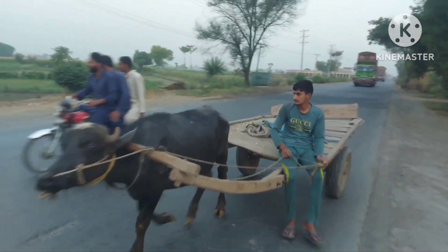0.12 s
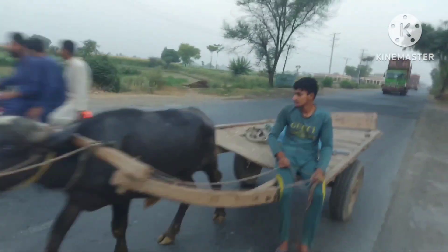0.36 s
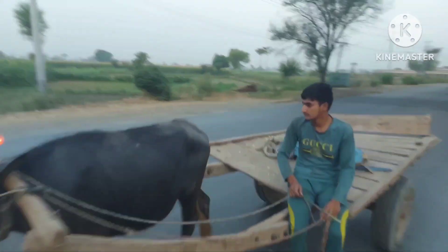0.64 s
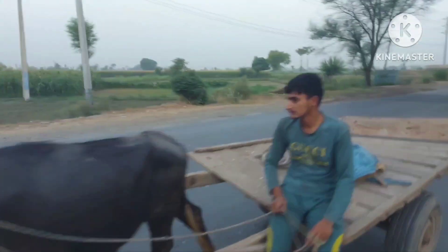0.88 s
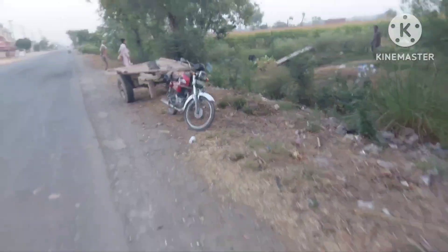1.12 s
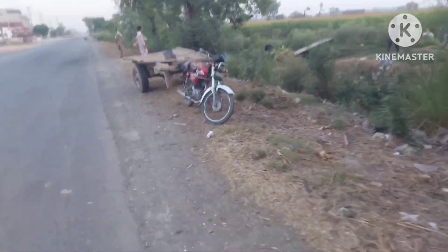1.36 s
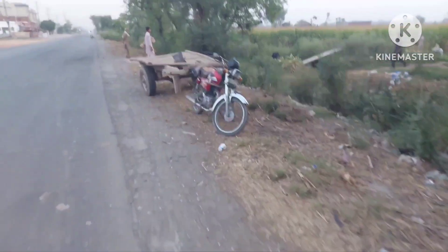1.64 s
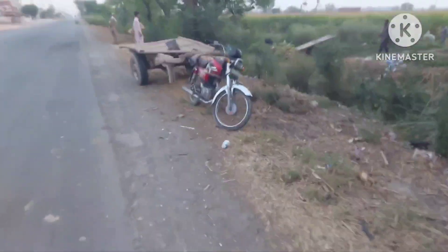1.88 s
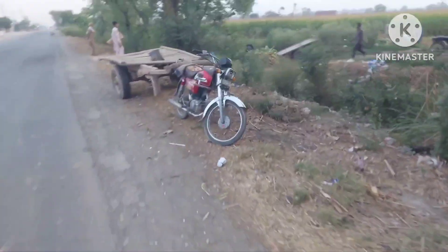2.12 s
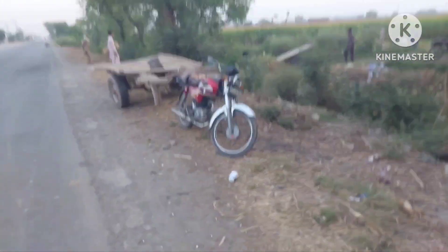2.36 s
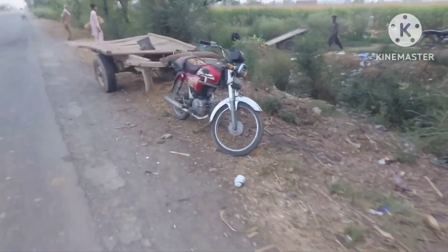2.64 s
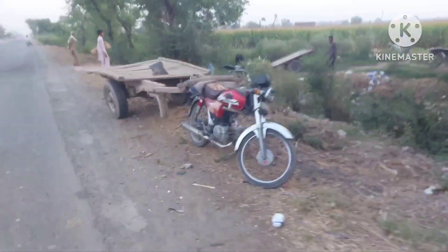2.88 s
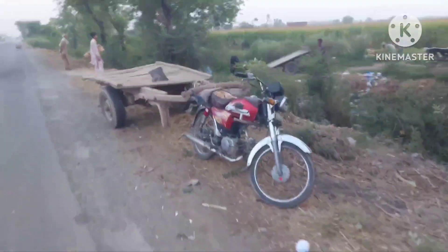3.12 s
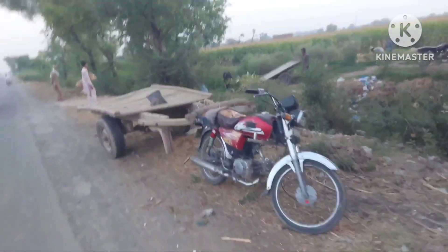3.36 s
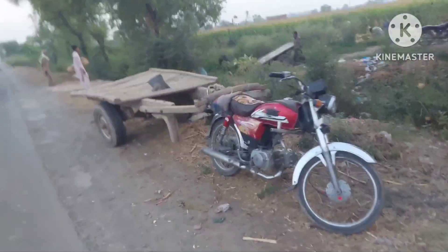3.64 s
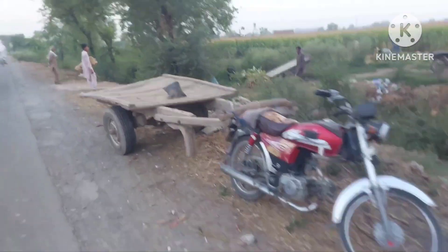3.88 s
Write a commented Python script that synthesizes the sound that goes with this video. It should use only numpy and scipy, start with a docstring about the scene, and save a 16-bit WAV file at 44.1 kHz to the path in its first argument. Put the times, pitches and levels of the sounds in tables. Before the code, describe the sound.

Motorcycle engine putters steadily over road noise for a second; after a brief near-silence, a quieter field verge has chirping sparrows, farther whistling birds, faint traffic hum and soft wind bumps on the stereo microphone.

```python
"""Motorcycle pass, then a quiet verge

A single-cylinder motorcycle thumps past over tyre and road noise: firing pulses excite band-pass resonances.
It cuts off into a short near-silence. Then, on a quieter verge, sparrows chirp close by as gliding near-sines
with scattered echoes, other birds whistle further off over a faint flock, and filtered noise makes distant
traffic, engine drones and wind that nudges the microphone ports. A few dry ticks of grit sound underfoot.
"""
import sys
import numpy as np
from scipy import signal
from scipy.fft import rfft, irfft
from scipy.io import wavfile
from scipy.ndimage import uniform_filter1d

SR = 44100
rng = np.random.default_rng(int(sys.argv[2]) if len(sys.argv) > 2 else 0)


def waveform_to_disk(signal):
    """Save audio, clipped to [-1, 1], as 16-bit WAV at the path in sys.argv[1]."""
    frames = np.transpose(np.atleast_2d(signal))
    scaled = np.clip(frames, -1, 1) * 32767
    samples = np.round(scaled).astype(np.int16)
    wavfile.write(sys.argv[1], SR, samples)


def gain_from_db(level_db):
    """Convert decibel levels to linear amplitude factors (20 dB per decade)."""
    decades = np.asarray(level_db, float) / 20
    return 10 ** decades


N = 176400  # samples, 4 s
RESUME_S = 1.153  # the verge reaches full level just after this


def band(x, hz, width_hz):
    """Resonance: a two-pole band-pass of given centre and width."""
    return signal.lfilter(*signal.iirpeak(hz, hz / width_hz, fs=SR), x)


def unit(x):
    """Normalisation: scale to rms 1."""
    return x / np.sqrt(np.mean(x ** 2))


def curve(rows, column):
    """Linear interpolation: one column of a table over time."""
    rows = np.array(rows)
    return np.interp(np.arange(N) / SR, rows[:, 0], rows[:, column])


def walk(rate):
    """Random modulation: levels held 1 / rate s and smoothed twice, scaled to rms 1."""
    hold = int(SR / rate)
    steps = np.repeat(rng.standard_normal(N // hold + 1), hold)[:N]
    return unit(uniform_filter1d(uniform_filter1d(steps, hold), hold))


def lag(hz):
    """Inter-port delay: phase turn from left port to right, its lag shrinking toward the bass."""
    treble_lag_s, knee_hz = 0.0005016, 507
    return np.exp(-2j * np.pi * hz * treble_lag_s * hz / (hz + knee_hz))


def ports(x, pan_db):
    """Time and level difference: a common sound reaches the right port slightly later."""
    late = irfft(rfft(x) * lag(np.fft.rfftfreq(N, 1 / SR)), N)
    return np.array([x * gain_from_db(pan_db / 2), late * gain_from_db(-pan_db / 2)])


# Coherence of diffuse noise between the two ports
# frequency_hz, common_share (0-1), left_minus_right_db
PORT_COHERENCE = [(59, 1, 0), (197, 0.53, -1.5), (690, 0.83, -1.1), (1880, 0.2, -2.5), (5340, 0, -3.5),
                  (8750, 0, -9.5), (15000, 0, 5)]


def wash(spectrum, flicker_db, rate):
    """Diffuse field: coloured, partly coherent stereo noise whose octave bands flicker, partly together."""
    hz = np.fft.rfftfreq(N, 1 / SR) + 1

    def at(rows, column):
        rows = np.array(rows)
        return np.interp(np.log(hz), np.log(rows[:, 0]), rows[:, column])

    share, pan = np.clip(at(PORT_COHERENCE, 1), 0, 1), at(PORT_COHERENCE, 2) / 2
    common, own_left, own_right = rfft(rng.standard_normal((3, N)))
    left = np.sqrt(share) * common + np.sqrt(1 - share) * own_left
    right = np.sqrt(share) * common * lag(hz) + np.sqrt(1 - share) * own_right
    both = gain_from_db(at(spectrum, 1)) * np.array([gain_from_db(pan) * left, gain_from_db(-pan) * right])
    octave, swell = np.log2(hz / 30), walk(3)
    out = 0
    for k in range(10):
        one_band = irfft(both * np.clip(1 - abs(octave - k), 0, 1), N)
        out = out + one_band * gain_from_db(flicker_db * (walk(rate) + 0.96 * swell))
    return unit(out)


def note(level_db, start, length, hz0, hz1, hz2, rough, warble, flutter):
    """Frequency modulation: a near-sine glides through three pitches, fluttering in strength and pitch."""
    i = int(start * SR)
    u = np.arange(int(length * SR)) / (length * SR)
    strength, pitch = flutter[:, i:i + len(u)]
    arch = 1 - abs(2 * u - 1) ** 1.5
    hz = hz0 + (hz2 - hz0) * u + (hz1 - (hz0 + hz2) / 2) * arch
    hz = hz * (1 + warble * pitch)
    # rises over the first tenth, falls over the last fifth
    fade = np.sin(np.pi / 2 * np.clip(np.minimum(2 * u, 1 - u) / .2, 0, 1))
    out = np.zeros(N)
    tone = np.sin(2 * np.pi * np.cumsum(hz) / SR)
    out[i:i + len(u)] = gain_from_db(level_db + 3.5) * fade * (1 + rough * strength) * tone
    return out


def whistles(rows):
    """Near-pure tones: thin, steady notes, each with its own level difference between the ports."""
    slow = np.array([walk(150), walk(220)])
    return sum(ports(note(db, s, d, a, b, c, .15, .008, slow), pan) for s, d, a, b, c, db, pan in rows)


def hedge(x):
    """Diffuse reverberation: scattered echoes from trees and hedges, different at each port."""
    t60_s, echo_db = .16, -6
    t = np.arange(12000) / SR
    tail = rng.standard_normal((2, len(t))) * np.exp(-np.log(1000) * t / t60_s)
    tail /= np.sqrt(np.sum(tail ** 2, axis=1, keepdims=True))
    return x + gain_from_db(echo_db) * signal.fftconvolve(x, tail, axes=1)[:, :N]


# Spectrum of distant traffic on the verge
# frequency_hz, relative density_db (per Hz)
TRAFFIC_SPECTRUM = [(18, -37), (30, -8), (69, 4), (182, -2.5), (332, -4), (467, -11.5), (639, -2.5),
                    (874, -12.5), (1200, -4), (1550, -15), (1870, -15), (2830, -19), (4190, -20),
                    (8060, -29), (9430, -44), (12600, -32.5), (15500, -45)]


def distant_traffic():
    """Broadband noise: many far sources merge into a coloured, flickering hum."""
    return gain_from_db(-40.5) * wash(TRAFFIC_SPECTRUM, 1.2, 12)


# Far engine drones
# frequency_hz, width_hz, level_db (before the swell)
DRONE_BANDS = [(178, 6.3, -47), (316.4, 33, -53), (387, 19.6, -55.5), (634, 100, -67.5), (1350, 140, -58),
               (1844, 120, -56.5)]
# Slow changes of wind and drones
# start_s, relative wind level_db, drone swell_db
WIND_AND_SWELL = [(1.17, -55, -3), (1.28, -92, -1.5), (1.89, -49, -1), (2.13, -51.5, 2), (2.93, -48, 1.5),
                  (3.32, -54, 2.5), (4.0, -47, 2.5)]


def engine_drones():
    """Narrow-band noise: resonated noise swells slowly as far engine drones."""
    drones = sum(gain_from_db(db) * unit(band(rng.standard_normal(N), hz, w)) for hz, w, db in DRONE_BANDS)
    return ports(drones * gain_from_db(curve(WIND_AND_SWELL, 2)), -0.22)


def wind():
    """Turbulent pressure: low noise on the ports, partly common and strongest at the right."""
    gusts = []
    for _ in range(3):
        rumble = unit(band(band(rng.standard_normal(N), 74.5, 82), 63, 87))
        gusts.append(rumble * gain_from_db(2.1 * walk(8.5)))
    common, left, right = gusts
    level = gain_from_db(curve(WIND_AND_SWELL, 1) + 1.5)
    return level * (0.9 * common + np.array([0.33 * left, 1.82 * right]))


# Wind buffets, mainly on the right port
# start_s, relative level_db, pitch_hz
WIND_BUFFETS = [(2.54, -28, 83), (2.798, -29.5, 74.5), (2.969, -34, 81), (3.017, -22.5, 84),
                (3.139, -33, 135), (3.317, -32.5, 73.4)]


def buffets():
    """Pressure puffs: short low sines under a Gaussian envelope."""
    t, out = np.arange(N) / SR, 0
    for s, db, hz in WIND_BUFFETS:
        envelope = np.exp(-((t - s - .012) / 0.0081) ** 2)
        out = out + gain_from_db(db) * envelope * np.sin(2 * np.pi * hz * (t - s))
    return np.array([0.16 * out, 1.63 * out])


# Small dry ticks of grit underfoot
# start_s, relative level_db, left_minus_right_db
GRIT_TICKS = [(3.2585, -63, -20), (3.5314, -49, -4), (3.7479, -55, -3.0)]


def ticks():
    """Impact transients: differentiated noise dies away exponentially within milliseconds."""
    t = np.arange(300) / SR
    out = np.zeros((2, N))
    for s, db, pan in GRIT_TICKS:
        i = int(s * SR)
        tick = np.diff(rng.standard_normal(300), prepend=0) * np.exp(-t / 0.0018)
        out[:, i:i + 300] += np.outer(gain_from_db(db + np.array([pan, -pan]) / 2), tick)
    return out


def flock():
    """Superposition: many short faint cheeps at random moments over a blurred narrow-band murmur."""
    centre_hz = 4300
    slow = np.array([walk(150), walk(300)])
    cheeps = np.zeros(N)
    for _ in range(70):
        loudness, pitch, begin, end = rng.standard_normal(4)
        when, size = rng.random(2)
        pitches = centre_hz * np.exp(.16 * pitch + 0.027 * np.array([begin, 0, end - 1]))
        cheeps += note(-61 + 2.5 * loudness, RESUME_S + 2.75 * when, 0.0095 + 0.018 * size, *pitches,
                       0.05, 0.057, slow)
    murmur = gain_from_db(-65) * unit(band(band(rng.standard_normal(N), centre_hz, 830), centre_hz, 920))
    return hedge(ports(cheeps + murmur, -7.5))


# A long, low whistle
# start_s, length_s, start_pitch_hz, middle_pitch_hz, end_pitch_hz, relative level_db, left_minus_right_db
LOW_WHISTLE = [(1.185, .11, 1920, 2020, 1970, -52, -3), (1.275, .1, 1960, 1970, 1950, -48, -3),
               (1.345, .1, 1960, 1900, 1830, -46, -3), (1.44, .06, 1780, 1740, 1650, -55, -3)]


def trill():
    """Amplitude modulation: a low whistle throbs at first and then runs smooth."""
    throbs_per_s, full_depth, smooth_from_s = 74, .75, 1.385
    t = np.arange(N) / SR
    depth = full_depth * np.clip((smooth_from_s - t) / .08, 0, 1)
    return whistles(LOW_WHISTLE) * (1 + depth * np.cos(2 * np.pi * throbs_per_s * t - 2.7))


# Sparrow chirp strokes
# start_s, length_s, start_pitch_hz, middle_pitch_hz, end_pitch_hz, relative level_db
CHIRP_STROKES = [(1.432, .028, 3150, 3400, 4300, -47), (1.463, .022, 2400, 2650, 3000, -47),
                 (1.482, .013, 3700, 3850, 3650, -42), (1.497, .02, 3000, 2600, 2400, -45),
                 (1.39, .036, 4600, 4350, 3700, -51), (1.686, .024, 4500, 6300, 4600, -38),
                 (1.712, .04, 5000, 4200, 3100, -37), (1.692, .03, 6000, 5400, 4600, -36),
                 (2.05, .03, 4300, 3700, 2900, -46), (2.085, .033, 3500, 4900, 3600, -36),
                 (2.125, .035, 3000, 3200, 2800, -41), (2.437, .018, 5500, 8000, 5500, -42),
                 (2.45, .03, 6500, 4950, 4900, -45), (2.496, .018, 4700, 5000, 5000, -43),
                 (2.482, .017, 4000, 6200, 4500, -42), (2.5, .032, 4400, 3900, 3100, -39),
                 (2.566, .018, 3800, 5500, 8900, -45), (2.578, .023, 3900, 8300, 3800, -35),
                 (2.603, .015, 3800, 6600, 3900, -36), (2.638, .024, 3000, 2750, 2400, -42),
                 (2.615, .028, 4700, 4200, 3500, -36), (2.972, .022, 4200, 4100, 2900, -43),
                 (2.991, .019, 3200, 3650, 3700, -42), (3.007, .018, 3800, 2850, 2300, -41),
                 (3.043, .013, 2450, 2500, 2900, -42), (3.053, .017, 3600, 4400, 3400, -36),
                 (3.072, .023, 2500, 4000, 2800, -39), (3.094, .014, 2650, 2450, 2250, -41),
                 (3.308, .032, 6200, 6500, 5200, -42), (3.322, .034, 5300, 4750, 4300, -42),
                 (3.352, .032, 2900, 3700, 2700, -46), (3.384, .016, 4800, 5500, 6500, -47),
                 (3.399, .02, 3700, 6700, 3700, -35), (3.423, .01, 3700, 4100, 3800, -41),
                 (3.44, .03, 3000, 4400, 3000, -38), (3.466, .028, 2900, 2950, 2900, -45),
                 (3.818, .018, 5000, 7900, 4000, -39), (3.836, .017, 5200, 6000, 4300, -34),
                 (3.853, .035, 4600, 4000, 3000, -38), (3.878, .028, 6300, 5800, 4200, -43)]


def sparrows():
    """Two-voiced source: rough gliding strokes with a weaker, later, higher second voice, then filtered."""
    rough, warble = .5, .027
    up, delay_s, second_db = 1.07, .004, -9
    fast = np.array([walk(1300), walk(900)])
    chirps = np.zeros(N)
    for s, d, a, b, c, db in CHIRP_STROKES:
        chirps += note(db, s, d, a, b, c, rough, warble, fast)
        chirps += note(db + second_db, s + delay_s, d, a * up, b * up ** 0.35, c * up,
                       rough, warble, fast[::-1])
    bright = chirps / 2 + band(chirps, 5000, 2500)
    return gain_from_db(-2.5) * signal.lfilter(*signal.butter(2, 5800, fs=SR), bright)


def treble_trace(chirps):
    """Envelope following: separate faint noise around 11 kHz, no part of the birds' voice, tracks their level."""
    treble = unit(band(band(rng.standard_normal((2, N)), 11300, 8000), 11300, 8000))
    envelope = np.sqrt(uniform_filter1d(chirps ** 2, size=400).clip(0))
    return gain_from_db(-21.5) * treble * envelope


# Where the sparrows sit
# start_s, left_minus_right_db
SPARROW_PERCH = [(1.45, -13.5), (1.7, -4), (2.1, -7.5), (2.5, -11.5), (2.6, -10.5), (3.05, -9), (3.33, -4),
                 (3.42, -13), (3.85, -12)]
# Farther birds
# start_s, length_s, start_pitch_hz, middle_pitch_hz, end_pitch_hz, relative level_db, left_minus_right_db
FAR_BIRDS = [(1.214, .02, 4500, 4100, 5000, -51, -6), (1.238, .016, 5000, 4850, 4500, -50, -6),
             (1.287, .014, 4300, 4100, 3950, -53, -5), (1.51, .015, 4800, 5000, 4700, -51, -7),
             (1.56, .055, 5800, 6100, 5700, -58, -4), (1.655, .065, 3250, 3300, 3400, -45, -1),
             (1.87, .112, 3740, 3720, 3750, -46.5, 4), (2.42, .014, 4200, 4100, 4000, -49, -8),
             (2.658, .014, 5000, 4850, 4600, -49, -8), (2.763, .017, 3700, 3700, 3600, -50, -4),
             (2.935, .02, 4900, 4900, 4700, -51, -8), (3.208, .035, 4500, 4800, 4500, -52, -8),
             (3.27, .02, 4400, 4200, 4100, -55, -8), (3.468, .025, 3700, 3750, 3600, -47, -7),
             (3.508, .03, 4850, 4900, 4700, -51, -8), (3.555, .03, 4400, 4200, 3900, -51, -8),
             (3.775, .035, 4500, 4800, 4900, -52, -8)]


def birds():
    """Direct and reflected sound: near chirps and farther whistles share the echoes of the hedge."""
    chirps = sparrows()
    direct = ports(chirps, curve(SPARROW_PERCH, 1)) + whistles(FAR_BIRDS) + trill()
    return hedge(direct) + treble_trace(chirps)


def verge():
    """Superposition: traffic, drones, wind, far flock, ticks and birds add linearly."""
    air = distant_traffic() + engine_drones() + wind() + buffets()
    return air + flock() + ticks() + birds()


# Birds heard through the engine
# start_s, length_s, start_pitch_hz, middle_pitch_hz, end_pitch_hz, relative level_db, left_minus_right_db
ROADSIDE_BIRDS = [(.005, 0.087, 2480, 2336, 2360, -55.5, -12), (.714, 0.013, 3660, 3650, 3530, -35, -1),
                  (.729, 0.0085, 3230, 3080, 2880, -40, 5)]


def roadside_birds():
    """Near-pure tones: a few short whistles beside the road."""
    return whistles(ROADSIDE_BIRDS)


# Spectrum of road and engine noise
# frequency_hz, relative density_db (per Hz)
ROAD_SPECTRUM = [(18, -44), (30, -15), (55, -15), (97, -8), (130, -10.5), (379, -13.5), (432, -17),
                 (787, -15), (1770, -21), (2240, -21.5), (2550, -26.5), (7650, -32.5), (9190, -42.5),
                 (11300, -36), (15500, -44.5)]
# Layer levels during the pass, before the modulation of noise and hiss
# start_s, thump level_db, pipe ring level_db, road noise level_db, tyre and chain hiss level_db
PASS_LEVELS = [(0, -34.5, -41.5, -36.5, -86), (.2, -33, -41, -36.5, -69), (.45, -31.5, -41, -34, -51),
               (.6, -30.5, -32.5, -35.5, -42.5), (.75, -31, -33.5, -35, -41), (.87, -30, -36.5, -32, -40.5),
               (.95, -27, -31, -35, -42.5), (1.08, -29.5, -29.5, -36, -41)]


def road_noise(phase):
    """Periodic modulation: road and engine noise swells once per firing cycle."""
    swell_db = np.cos(2 * np.pi * (phase - .2))  # 1 dB up and down
    return wash(ROAD_SPECTRUM, 1.2, 16.6) * gain_from_db(curve(PASS_LEVELS, 3) + swell_db)


def tyre_hiss():
    """Crackling noise: tyre and chain hiss is spiky band-passed noise with a fluttering level."""
    crackle = rng.standard_normal(N) * gain_from_db(4.5 * rng.exponential(size=N))
    level_db = curve(PASS_LEVELS, 4) + 2.9 * walk(40.6) + 2.45 * walk(180)
    return ports(unit(band(crackle, 1700, 1070)) * gain_from_db(level_db), -1.1)


# Firing rate of the engine
# start_s, firing_rate (per s)
FIRING_RATE = [(0, 21.1), (1.08, 22.12)]


def firing_phase():
    """Phase integration: the firing rate accumulates into cycles, the first starting at 3.2 ms."""
    return np.cumsum(curve(FIRING_RATE, 1)) / SR - .0032 * FIRING_RATE[0][1]


# Pipe resonances
# frequency_hz, width_hz, relative level_db
PIPE_MODES = [(109.3, 3.6, 5), (173.7, 5.6, -2), (284, 13.4, 1), (352, 8.1, -2), (449.3, 15, -6.5)]


def exhaust(phase):
    """Impulse excitation: each firing makes a low thump and rings the modes of the pipe."""
    fired = np.flatnonzero(np.diff(np.floor(phase), prepend=-1) > 0)
    pulses = np.zeros(N)
    pulses[fired] = gain_from_db(.7 * rng.standard_normal(len(fired)))  # scatter in dB
    thump, thump_hz = np.diff(pulses, prepend=0), 120
    for width_hz in (110, 143, 198):
        thump = band(thump, thump_hz, width_hz)
    # noise that decays within each cycle adds rasp to the ring
    rasp = pulses + .008 * np.exp(-(phase % 1) / .5) * rng.standard_normal(N)
    ring = unit(sum(gain_from_db(db) * unit(band(band(rasp, hz, w), hz, 2 * w)) for hz, w, db in PIPE_MODES))
    return ports(unit(thump) * gain_from_db(curve(PASS_LEVELS, 1)) + ring * gain_from_db(curve(PASS_LEVELS, 2)), 0.4)


def motorcycle():
    """Synchronous sources: exhaust and road noise follow one firing phase, beside hiss and birds."""
    phase = firing_phase()
    return roadside_birds() + road_noise(phase) + tyre_hiss() + exhaust(phase)


def scene():
    """Gating in time: the pass is cut off with a faint dying tail; then comes the verge."""
    cut_s, tail_db, tail_db_per_s = 1.081, -26, -700
    t = np.arange(N) / SR
    cut = np.clip((cut_s - t) / 0.0011, 0, 1)
    tail = (t < RESUME_S) * gain_from_db(tail_db + tail_db_per_s * np.clip(t - cut_s, 0, 1))
    # the verge is faintly present for 22 ms before it opens
    faint = gain_from_db(-26.5) * (t > RESUME_S - .022)
    opening = np.clip((t - RESUME_S) / 0.0025, faint, 1)
    return motorcycle() * np.maximum(cut, tail) + verge() * opening


def roll_off(x):
    """The treble ends steeply here."""
    return signal.sosfilt(signal.butter(12, 15730, fs=SR, output="sos"), x)


def record(dry):
    """High-pass response: the microphone drops the deep bass below 42 Hz."""
    mix = signal.sosfilt(signal.butter(4, 42, "high", fs=SR, output="sos"), dry)
    return roll_off(mix)


dry = scene()
out = record(dry)
waveform_to_disk(out)
```